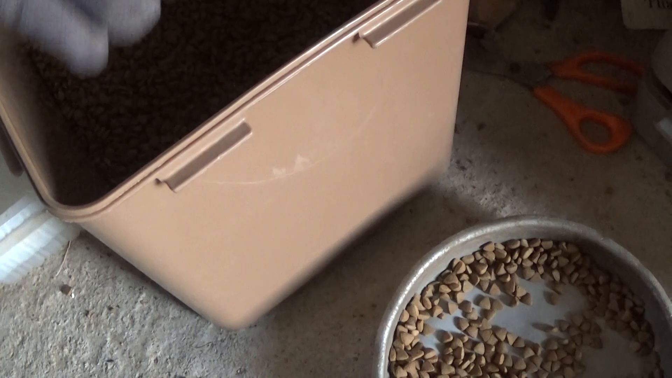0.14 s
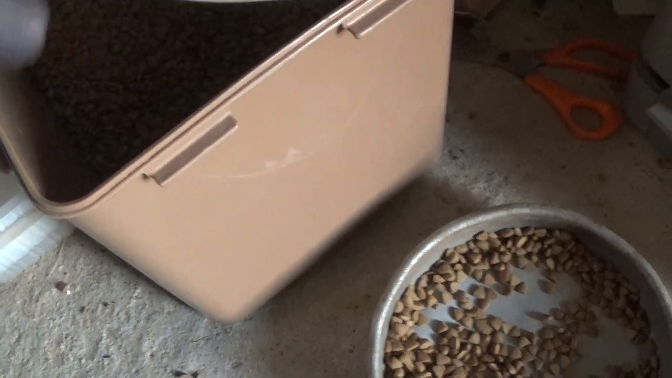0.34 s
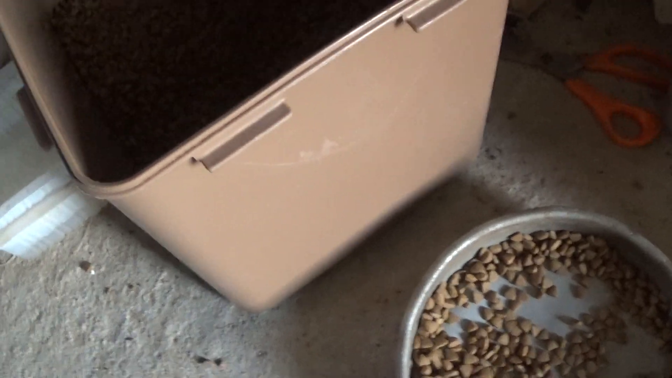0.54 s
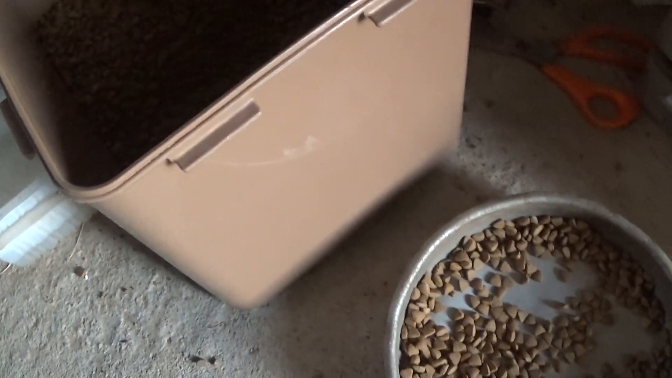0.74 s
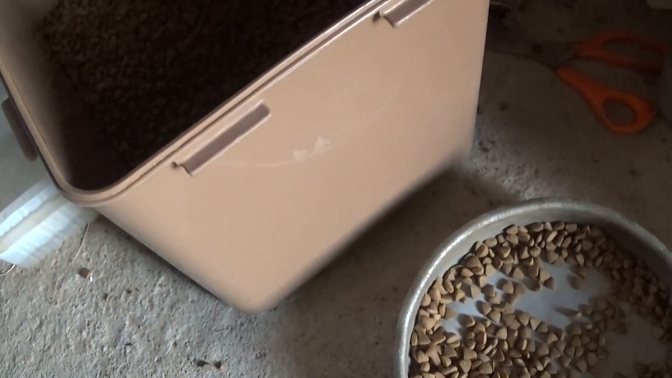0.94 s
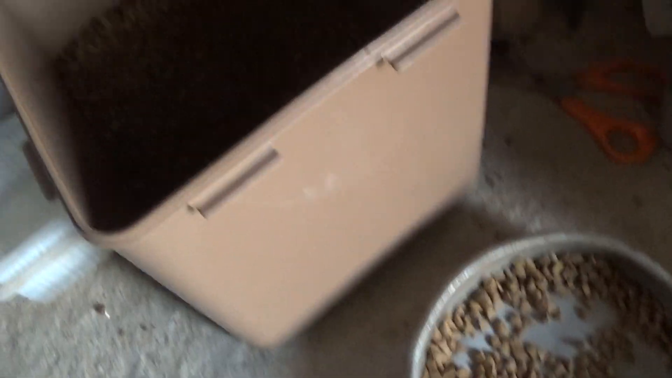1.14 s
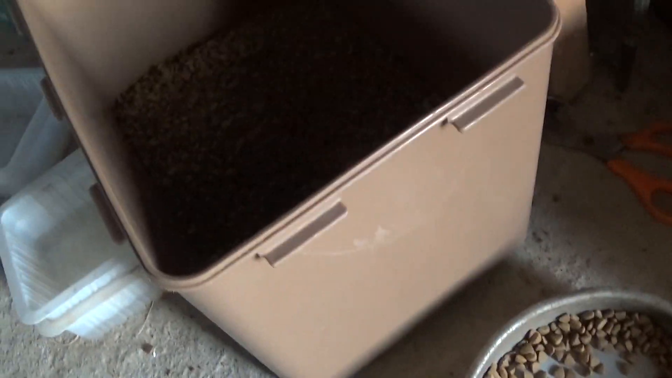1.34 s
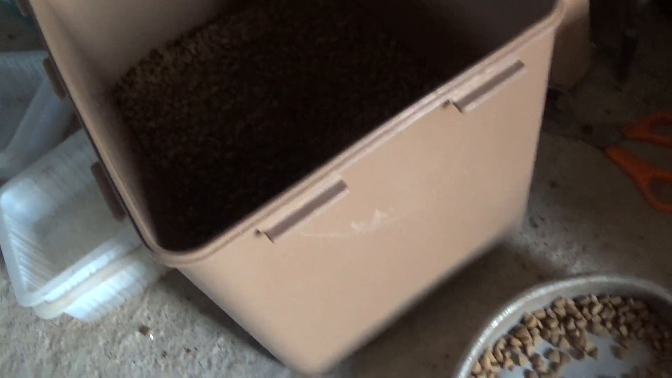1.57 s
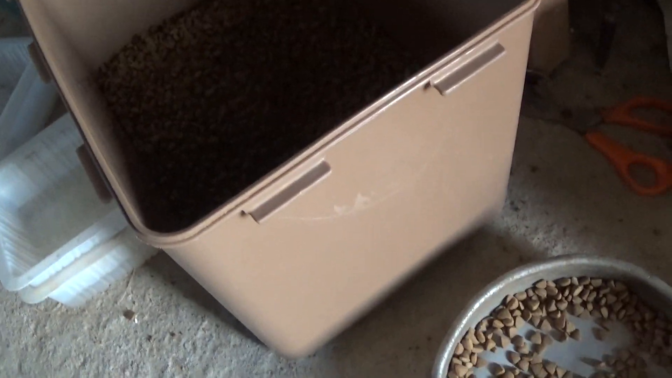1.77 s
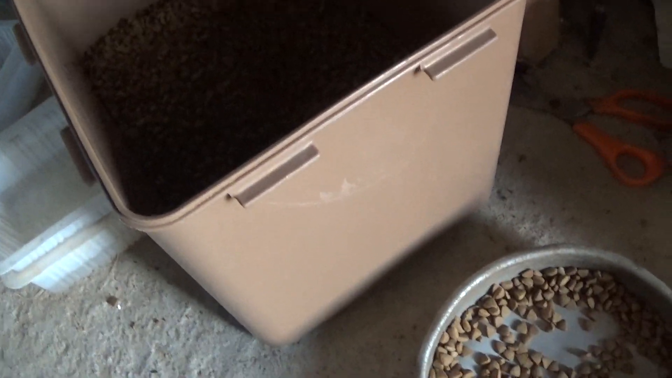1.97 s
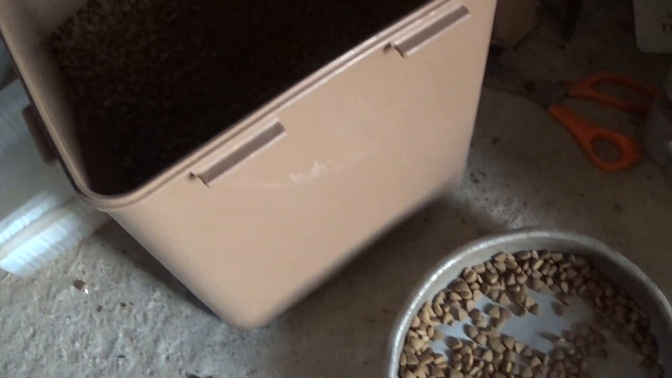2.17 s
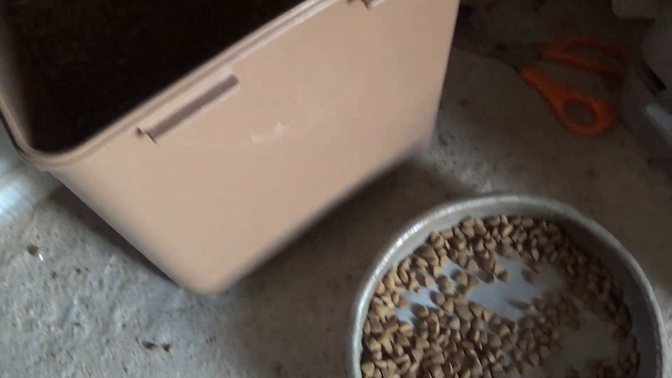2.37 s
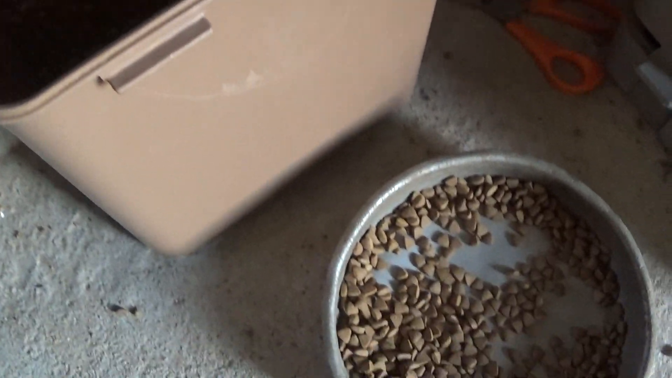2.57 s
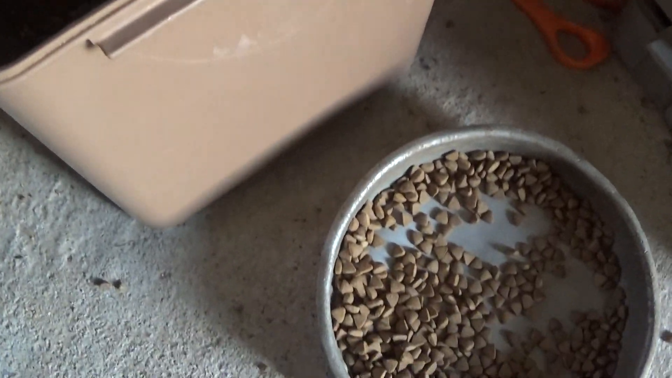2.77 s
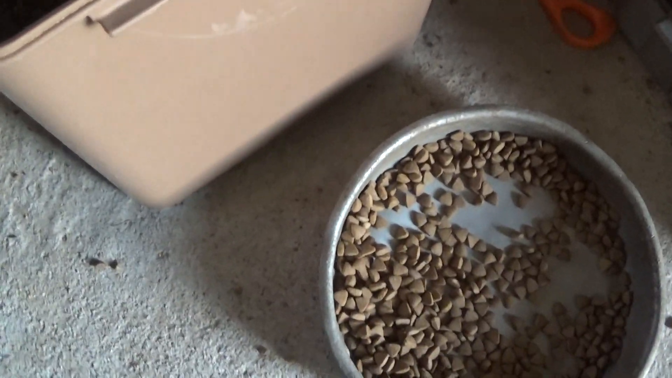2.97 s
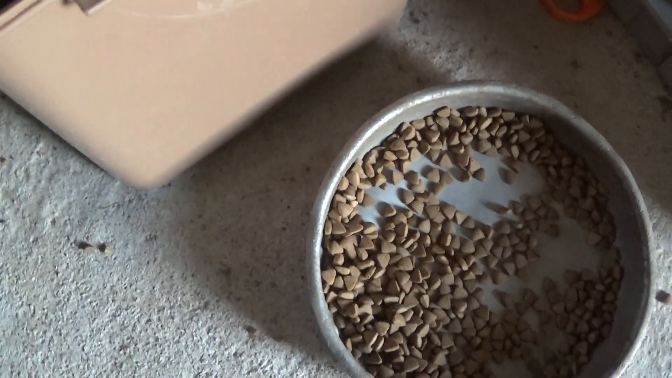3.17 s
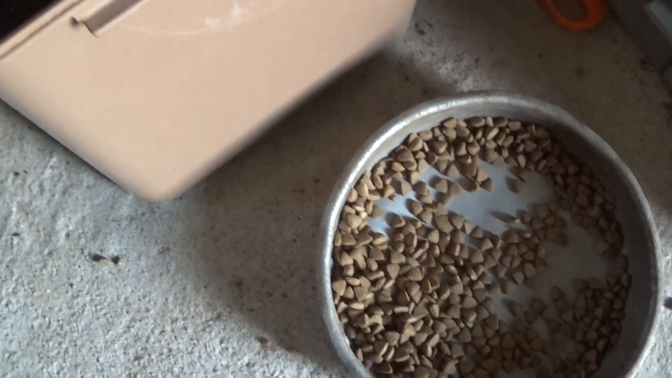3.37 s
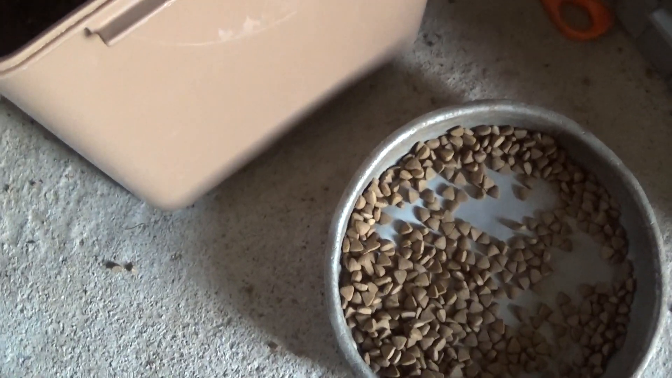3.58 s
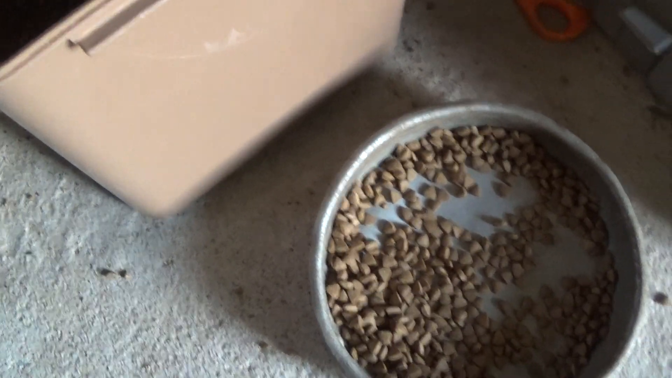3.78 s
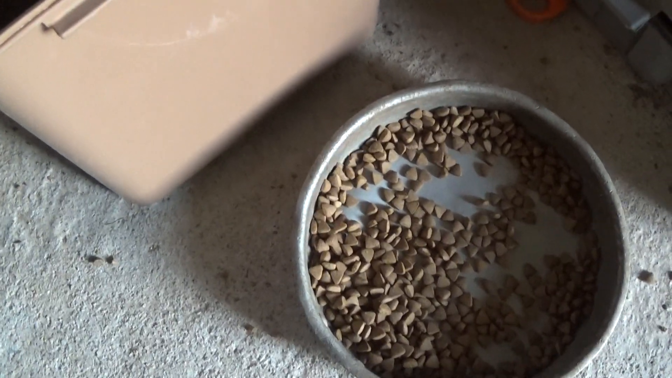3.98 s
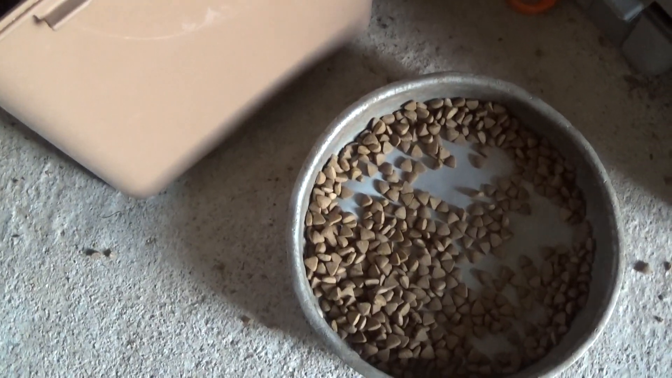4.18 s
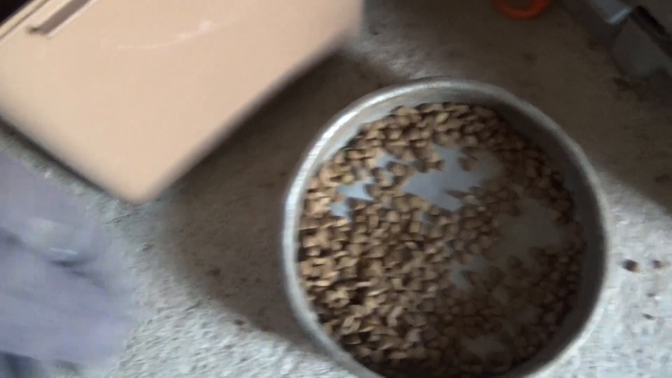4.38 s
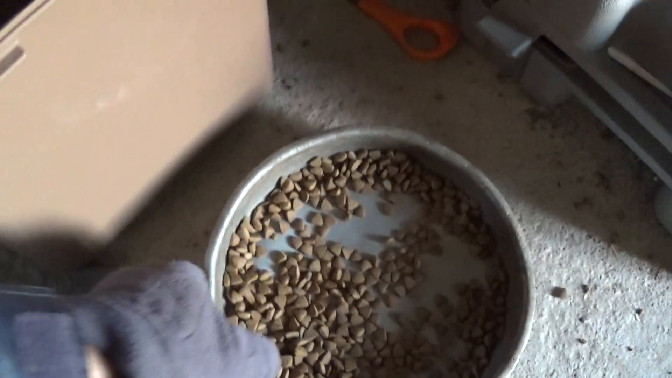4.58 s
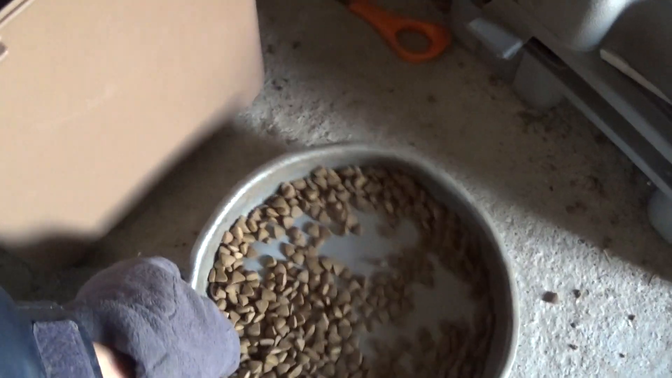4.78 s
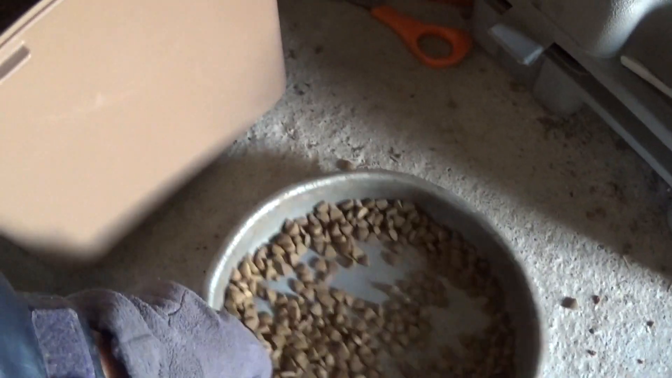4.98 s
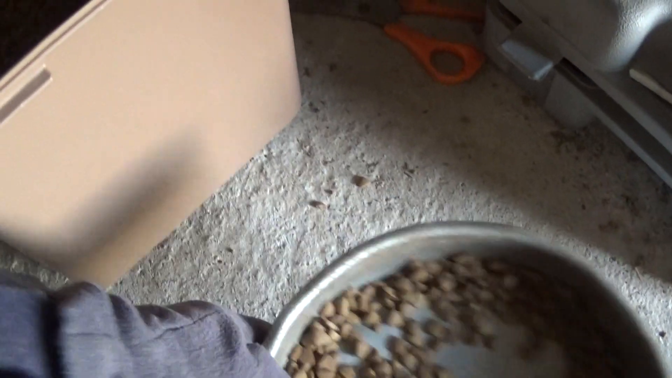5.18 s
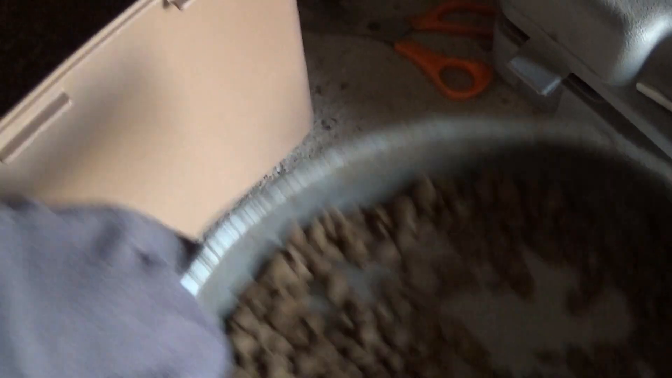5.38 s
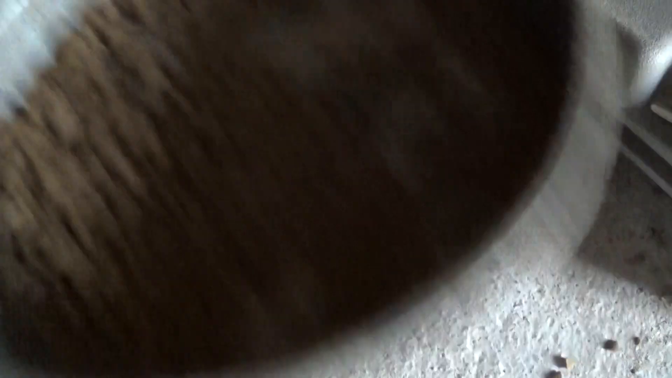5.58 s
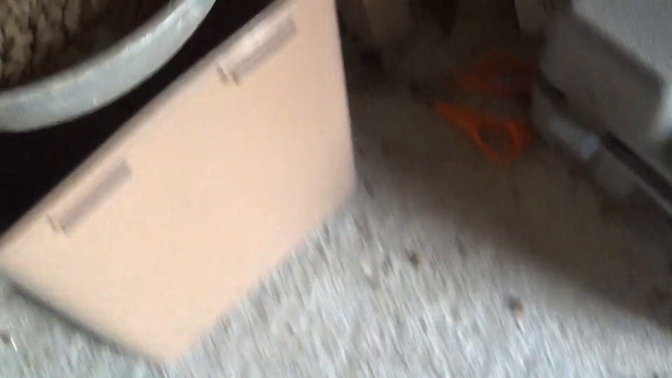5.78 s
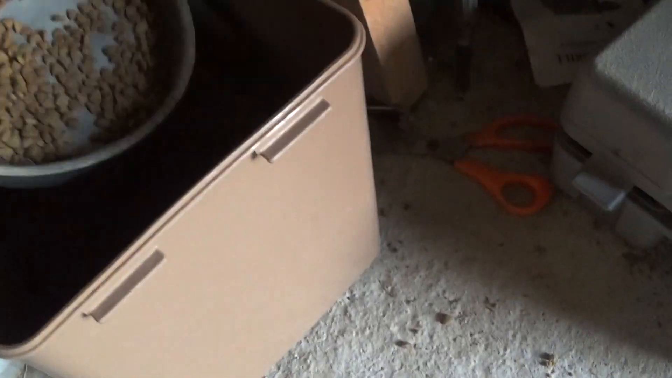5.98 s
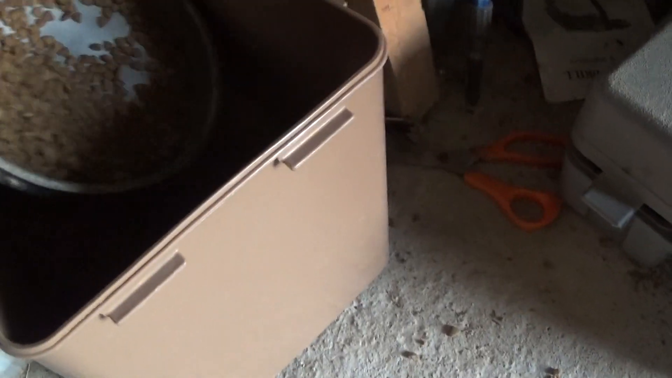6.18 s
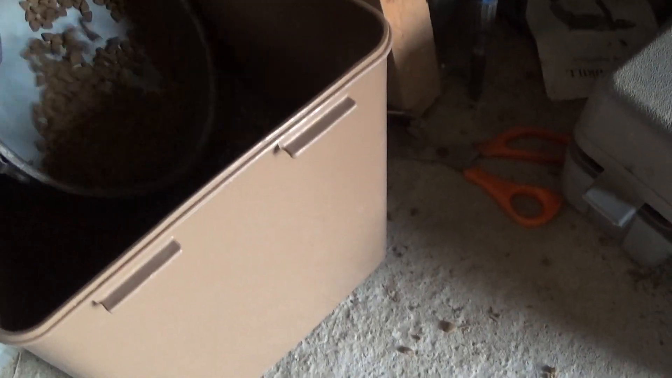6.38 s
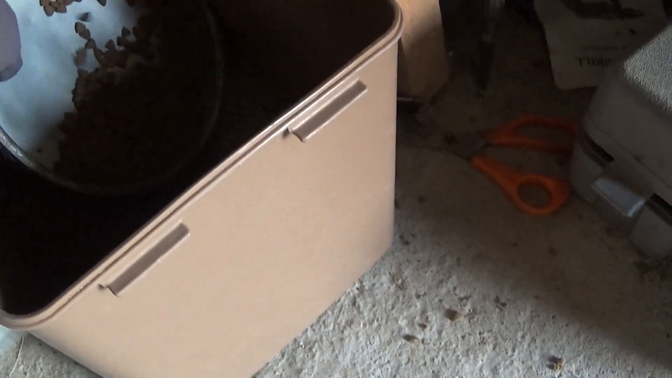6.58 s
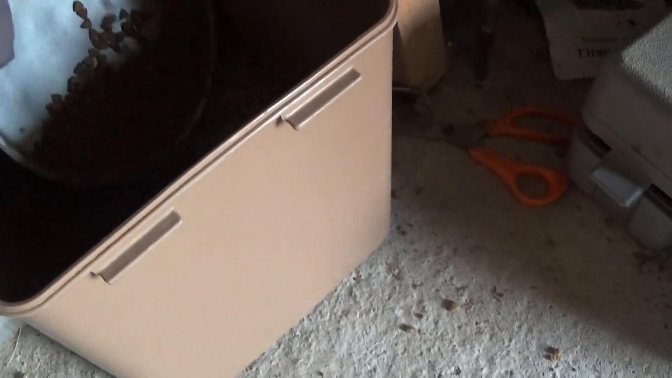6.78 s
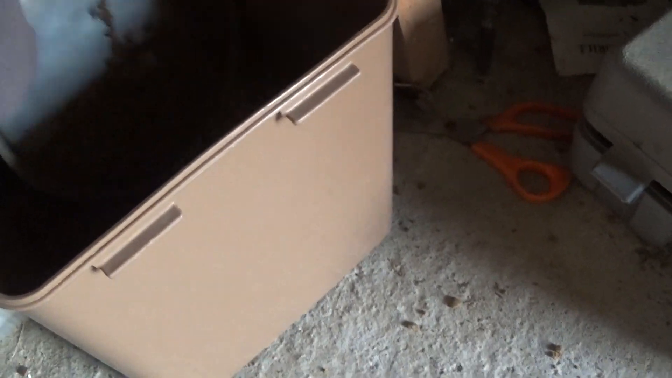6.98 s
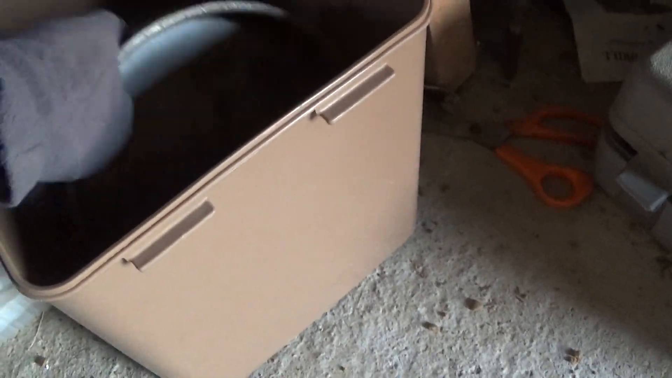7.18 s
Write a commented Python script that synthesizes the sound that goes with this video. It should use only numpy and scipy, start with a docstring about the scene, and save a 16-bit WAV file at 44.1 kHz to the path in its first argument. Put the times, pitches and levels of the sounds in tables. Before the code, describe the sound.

In a small shed, a hollow plastic bin bumps and scrapes across concrete in two short bouts, then takes several more knocks. Jacket fabric rustles throughout, close to the stereo microphone, over a faint low rumble from outside. A sleeve swishes, a metal bowl rasps and clicks as it is picked up, and finally dry kibble pours from it into the bin, ticking against the metal.

```python
"""A work jacket rustles close to a small stereo camera in a shed, over a faint outdoor rumble, and at once
a plastic feed bin is knocked and dragged in jerks over gritty concrete: impact and friction excite its
wall modes. A metal bowl of dry kibble is pulled off the floor in stick-slip snaps, carried to the bin and
tipped. The pieces slide, tick and finally rush out, and the bowl's modes rise as it sheds their mass."""
import sys
import numpy as np
from scipy import signal
from scipy.fft import rfft, irfft, next_fast_len
from scipy.io import wavfile
from scipy.ndimage import uniform_filter1d, minimum_filter1d

SR = 44100
rng = np.random.default_rng(int(sys.argv[2]) if len(sys.argv) > 2 else 0)


def dump(signal):
    """Clip the signal to [-1, 1] and save it as 16-bit WAV at the path in sys.argv[1]."""
    limited = np.clip(np.atleast_2d(signal).T, -1, 1)
    pcm = np.round(limited * 32767).astype(np.int16)
    wavfile.write(sys.argv[1], SR, pcm)


N = 318843
TIME = np.arange(N) / SR


def amp(db):
    """Amplitude ratio of a level in decibels."""
    return 10 ** (np.asarray(db) / 20)


def unit(x):
    """Normalisation to rms 1."""
    return x / np.sqrt(np.mean(x ** 2) + 1e-20)


def along(points, hz):
    """Interpolation of (frequency [Hz], value) points on a logarithmic frequency axis."""
    f, values = np.transpose(points)
    return np.interp(np.log(hz + 1), np.log(f + 1), values)


def curves(rows):
    """Linear envelopes, one for each column after time; the first is silent outside the table."""
    times, first, *others = np.transpose(rows)
    return [np.interp(TIME, times, first, -140, -140)] + [np.interp(TIME, times, c) for c in others]


def filtered(x, response):
    """Linear filtering: the spectrum is multiplied by a complex frequency response."""
    size = next_fast_len(N + SR // 8, True)
    return irfft(rfft(x, size) * response(np.fft.rfftfreq(size, 1 / SR)), size)[..., :N]


def highpass(corner_hz, order):
    """Response of cascaded first-order high-pass stages."""
    return lambda hz: (1j * hz / (1j * hz + corner_hz)) ** order


def colour(points):
    """Minimum-phase response through (frequency [Hz], gain [dB]) points, at unit power gain."""
    def response(hz):
        cepstrum = irfft(np.log(amp(along(points, hz)) + 1e-6))
        cepstrum[1:len(hz) - 1] *= 2
        cepstrum[len(hz):] = 0
        gain = np.exp(rfft(cepstrum))
        return gain / np.sqrt(np.mean(abs(gain) ** 2))
    return response


def modal(modes, widen):
    """Modal superposition at unit power gain; widen multiplies every bandwidth."""
    def response(f):
        gain = sum((-1) ** k * amp(db) * 1j * f * width * widen / (hz * hz - f * f + 1j * f * width * widen)
                   for k, (hz, width, db) in enumerate(modes))
        return gain / np.sqrt(np.mean(abs(gain) ** 2))
    return response


def resonance(x, hz, width_hz):
    """A single damped resonator that passes white noise at its own level."""
    return signal.lfilter(*signal.iirpeak(hz, hz / width_hz, SR), x) * np.sqrt(SR / np.pi / width_hz)


def grit(per_s, spread_db, t60, bed):
    """Shot noise: random contacts decay exponentially over a bed of steady friction."""
    hits = (rng.random(N) < per_s / SR) * amp(spread_db * rng.standard_normal(N))
    decay = amp(-60 * TIME[:SR // 20] / t60)
    envelope = unit(np.abs(signal.oaconvolve(hits, decay)[:N]))
    return unit((bed + envelope) * rng.standard_normal(N))


def bursts(times, db, t60, rise_s):
    """Impact transients: an exponentially decaying noise burst at each time."""
    t, hits = TIME[:SR // 10], np.zeros(N)
    hits[np.round(times * SR).astype(int)] = amp(db)
    shape = amp(-60 * t / t60) * (1 - np.exp(-t / rise_s))
    return signal.oaconvolve(hits, shape / shape.max())[:N] * rng.standard_normal(N)


def rings(times, db, pitch_hz, t60, wander):
    """Damped free vibrations whose phase takes a random walk as the contact shifts."""
    out, t = np.zeros(N), TIME[:SR // 20]
    for start, level_db, hz, life in zip(times, db, pitch_hz, np.broadcast_to(t60, len(times))):
        drift = np.cumsum(wander * rng.standard_normal(len(t)))
        envelope = amp(level_db - 60 * t / life) * np.minimum(1, t * hz)
        out[round(start * SR):][:len(t)] += envelope * np.sin(2 * np.pi * hz * t + drift)
    return out


def patchy(x, spread_db):
    """Random amplitude modulation in patches of time and frequency."""
    spectra = signal.stft(x, nperseg=256)[2]
    field = uniform_filter1d(rng.standard_normal(spectra.shape), size=4, axis=0)
    field = unit(uniform_filter1d(field, size=14, axis=1))
    return unit(signal.istft(spectra * amp(spread_db * field), nperseg=256)[1][:N])


# Cloth rubbing as the arm moves, and quick sleeve brushes: (time [s], hiss [dB], rustle [dB])
CLOTH_LEVELS = [(0, -51.5, -56.5), (0.08, -62, -50.5), (0.28, -38.5, -40), (0.72, -45, -41),
                (0.97, -36, -46.5), (1.03, -42, -44.5), (1.07, -54, -56), (1.24, -53, -51.5),
                (1.38, -65.5, -60.5), (1.5, -62, -54.5), (2.08, -46.5, -46), (2.58, -50.5, -46.5),
                (2.8, -58, -51), (3.16, -60, -56), (3.23, -42, -44.5), (3.45, -50.5, -48.5),
                (3.61, -61.5, -51), (3.8, -55, -47.5), (3.99, -53, -57), (4.1, -55, -42.5), (4.3, -34, -41),
                (4.5, -27.5, -32.5), (4.78, -48.5, -37.5), (5.23, -42.5, -41.5), (5.6, -38, -45.5),
                (5.67, -58.5, -60), (5.96, -53.5, -47.5), (6.08, -59.5, -55), (6.2, -39, -51)]
SLEEVE_BRUSHES = [(2.723, -48.5, -44.5), (2.946, -51, -45.5), (3.64, -47.5, -59), (3.71, -43, -57),
                  (3.857, -42, -47)]
# Bright and dull friction spectra: (frequency [Hz], relative level [dB])
HISS_SPECTRUM = [(1760, -12), (3000, 4), (8170, 3.5), (9460, 5.5), (11600, -2.5), (16000, -19.5)]
RUSTLE_SPECTRUM = [(60, -65), (227, -17), (360, -14), (654, -6), (857, -5.5), (1080, -4), (6000, -16),
                   (7800, -47)]


def jacket():
    """Friction noise: fibres catch by the thousand and merge into two almost smooth layers."""
    rise_db_per_s, fall_db_per_s = 476, 317
    gains = amp(curves(CLOTH_LEVELS)) * (TIME < CLOTH_LEVELS[-1][0])
    for start, *db in SLEEVE_BRUSHES:
        near = slice(round((start - .1) * SR), round((start + .2) * SR))
        t = TIME[near] - start
        gains[:, near] += amp(np.c_[db] + np.minimum(rise_db_per_s * t, -fall_db_per_s * t))
    hiss = filtered(patchy(rng.standard_normal(N), spread_db=1.3), colour(HISS_SPECTRUM))
    rustle = filtered(patchy(rng.standard_normal(N), spread_db=1.3), colour(RUSTLE_SPECTRUM))
    return gains[0] * hiss + gains[1] * rustle


# Far-off outdoor sound: (frequency [Hz], relative level [dB])
RUMBLE_SPECTRUM = [(25, -9.5), (250, 5.5), (500, 13), (1500, -99)]


def outdoor_rumble():
    """Ambient noise: distant sound forms a stationary low-frequency floor."""
    return amp(-62.5) * filtered(rng.standard_normal(N), colour(RUMBLE_SPECTRUM))


# Modes of the bin's walls: (frequency [Hz], nominal bandwidth [Hz], relative level [dB])
BIN_MODES = [(215, 45, -2.5), (265.5, 34, 4.5), (635, 39, 1), (1009, 115, 6.5), (1355, 340, 3),
             (1960, 700, 0), (4310, 1900, -2)]
# Spectra of the scraping bin and of small hard contacts: (frequency [Hz], relative level [dB])
SCRAPE_SPECTRUM = [(180, -82), (300, -20), (463, -9.5), (636, 1.5), (828, 0), (1300, -8), (1920, -0.5),
                   (7000, -13), (9100, -31), (12000, -76)]
TICK_SPECTRUM = [(2940, -48), (5000, 0.5), (7340, 3.5), (9690, 6), (13000, -7.5), (16000, -32)]
# Blows on bin and floor: (time [s], nominal level [dB], clack [Hz], relative boom [dB], relative crack [dB])
BIN_KNOCKS = [(0.081, -20, 850, -8, -36), (0.122, -9, 1190, -27, -15), (0.134, -12, 588, -30, -9),
              (0.147, -5, 552, -31, -36), (0.397, -4, 1570, -11.5, -21), (0.412, -7, 4730, -34, -37),
              (0.485, -7, 550, -35, -18), (0.565, -12.5, 704, -22, -3), (0.588, -4.5, 2880, -22, -19),
              (0.639, -13.5, 2370, -27, -22), (0.738, -14.5, 2436, -26, -31), (0.822, -20.5, 687, -21, -22),
              (1.235, -36, 3780, -37, 3), (1.271, -21, 1086, -47, -37), (1.304, -28.5, 945, -37, -40),
              (1.519, -3.5, 678, -24, -24), (1.752, -13.5, 1520, -10.5, -29), (1.807, -2, 1490, -43, -29),
              (1.986, -13.5, 2100, -46, -40), (2.379, -27, 1900, -43, -35), (2.427, -21.5, 1690, -43, -20),
              (2.816, -26, 2600, -34, -21), (2.9, -27.5, 3020, -38, -13), (2.918, -24.5, 1796, -23, -22),
              (2.923, -21, 4070, -31, -19.5), (3.076, -30.5, 674, -36, -21), (4.009, -2.5, 743, -11.5, -19),
              (4.029, -7.5, 1046, -25, -18), (4.11, -10, 620, -20, -19.5), (4.167, -11.5, 1225, -7, -10.5),
              (4.257, -14.5, 804, -14.5, -31), (4.326, -14.5, 740, -17, -33), (6.503, -21, 924, -49, 0),
              (6.505, -7.5, 232, -34, -30)]


def bin_knocks():
    """Impulse response: a blow excites the walls, the struck spot clacks and the lowest mode booms."""
    times, db, clack_hz, boom_db, crack_db = np.transpose(BIN_KNOCKS)
    walls = filtered(bursts(times, db - 17.5, t60=.05, rise_s=.00015), modal(BIN_MODES[2:], widen=.24))
    scuff = filtered(bursts(times, db - 13.5, t60=.053, rise_s=.001), colour(SCRAPE_SPECTRUM))
    clack_t60 = np.minimum(.05, 63 / clack_hz)  # high clacks die within 63 cycles
    clack = rings(times, db - 7, clack_hz, clack_t60, wander=.11)
    blows = np.bincount(np.round(times * SR).astype(int), amp(db + boom_db + 18), minlength=N)
    boom = filtered(blows, modal(BIN_MODES[:1], widen=.22))
    crack = filtered(bursts(times, db + crack_db - .5, t60=.033, rise_s=.000099), colour(TICK_SPECTRUM))
    return filtered(walls + scuff + clack + boom, highpass(150, order=4)) + crack


# Jerks over grit: (time [s], hold [s], level [dB], hollow resonance [Hz], relative fine grit [dB],
# relative boom [dB], flexing wall [Hz], relative wall ring [dB])
BIN_JERKS = [(0.127, 0.062, -21, 2250, -21, -13, 543, -11.5), (0.43, 0.11, -18, 2460, -16.5, -7, 578, -9),
             (0.585, 0.02, -19.5, 2580, -15, -4.5, 548, -7.5),
             (1.522, 0.11, -18.5, 1780, -19.5, -24, 644, -48), (1.691, 0.029, -36, 1450, -34, -7, 640, -17),
             (1.78, 0.02, -28, 1400, -27, -20, 646, -3), (1.808, 0.089, -16.5, 1470, -17.5, -59, 663, -11),
             (1.924, 0.0093, -23.5, 1800, -33, -50, 663, -16),
             (1.951, 0.05, -33.5, 1710, -41, -47, 666, -1.5)]
# Thin high modes of the bin's base: (frequency [Hz], relative level [dB])
RIB_MODES = [(4150, -18), (4950, 7), (6150, 8)]


def bin_drag():
    """Forced vibration: grit under the sliding base drives the bin's modes during each jerk."""
    rise_db_per_s, fall_db_per_s = 3500, 449
    rub = grit(per_s=800, spread_db=4.5, t60=.005, bed=.4)
    walls = filtered(rub, modal(BIN_MODES[2:], widen=.24))
    scrape = .71 * filtered(rub, colour(SCRAPE_SPECTRUM)) + .43 * walls
    boom = filtered(rub, modal(BIN_MODES[1:2], widen=2.2))
    fine = filtered(grit(per_s=450, spread_db=5.5, t60=.012, bed=.35), colour(TICK_SPECTRUM))
    ribs = amp(-16) * filtered(rub, modal([(hz, 82.5, db) for hz, db in RIB_MODES], widen=1))
    drag, t = np.zeros(N), TIME[:SR // 2] - .05
    for start, hold, db, hollow_hz, fine_db, boom_db, ring_hz, ring_db in BIN_JERKS:
        near = round((start + t[0]) * SR) + np.arange(len(t))
        gain = amp(db + np.minimum(0, np.minimum(rise_db_per_s * t, fall_db_per_s * (hold - t))))
        ring = amp(ring_db) * resonance(gain * rub[near], ring_hz, width_hz=32)
        hollow = amp(-8.5) * resonance(gain * rub[near], hollow_hz, width_hz=630)
        sliding = scrape[near] + amp(boom_db) * boom[near] + amp(fine_db) * fine[near] + ribs[near]
        drag[near] += gain * sliding + ring + hollow
    return drag


# One sweep of a sleeve: (time [s], level [dB], frequency [Hz])
SLEEVE_SWISH = [(4.38, -29.5, 1313), (4.53, -57, 1178), (4.66, -31, 564)]


def sleeve_swish():
    """Narrow-band noise: a falling tone with random amplitude modulation gives the sleeve's swish."""
    db, hz = curves(SLEEVE_SWISH)
    flutter = unit(uniform_filter1d(rng.standard_normal(N), size=500))
    return amp(db) * flutter * np.sin(2 * np.pi * np.cumsum(hz) / SR)


# Bowl rasping over the floor: (time [s], level [dB], relative fine grit [dB])
PULL_LEVELS = [(4.795, -45, 4), (4.812, -22, -8.5), (4.84, -21.5, -7), (4.875, -44, 2), (4.94, -34, -22),
               (4.965, -56, -2), (5.05, -41.5, 6.5), (5.12, -34, 2), (5.15, -40, 6.5), (5.212, -66, 29)]
# Modes of its bottom on stone: (frequency [Hz], nominal bandwidth [Hz], relative level [dB])
BOTTOM_MODES = [(1450, 91, 15.5), (2070, 850, 7.5), (5800, 680, 3)]
# Sudden slips: (time [s], ring level [dB], ring frequency [Hz], crack level [dB])
BOWL_SLIPS = [(4.809, -13.5, 1580, -33), (4.819, -9, 1880, -32), (4.827, -12, 1650, -27),
              (4.84, -11, 1630, -34), (4.868, -11.5, 2280, -32), (4.882, -14, 2110, -38),
              (4.892, -17, 2150, -28), (4.896, -7.5, 2080, -32), (4.906, -10.5, 1980, -16),
              (4.916, -15, 2200, -32), (4.923, -9.5, 2150, -43), (4.935, -14, 2310, -30),
              (4.949, -10.5, 2350, -26.5), (4.973, -10, 2300, -34), (4.983, -4, 1015, -24),
              (5.006, -7, 954, -27), (5.038, -13.5, 1370, -28), (5.117, -16.5, 1340, -17.5),
              (5.186, -42, 1400, -15.5), (5.191, -45, 930, -19), (5.199, -46, 920, -17),
              (5.321, -28, 1960, -28.5)]


def bowl_pull():
    """Stick-slip friction: the loaded bottom rasps on stone; each slip snaps and briefly rings it."""
    db, fine_db = curves(PULL_LEVELS)
    times, ring_db, hz, crack_db = np.transpose(BOWL_SLIPS)
    rub = grit(per_s=300, spread_db=4, t60=.012, bed=.5)
    fine = amp(fine_db) * filtered(rub, colour(HISS_SPECTRUM))
    rasp = amp(db) * (filtered(rub, modal(BOTTOM_MODES, widen=.88)) + fine)
    octave = rings(times, ring_db - 11, 2 * hz, t60=.016, wander=.07)
    ring = rings(times, ring_db, hz, t60=.016, wander=.12)
    crack = filtered(bursts(times, crack_db, t60=.013, rise_s=.00011), colour(TICK_SPECTRUM))
    return filtered(rasp + octave + ring, highpass(350, order=2)) + crack  # small contacts lack bass


# Kibble sliding out: (time [s], slide [dB], treble [dB], bin thud [dB])
POUR_LEVELS = [(6.1, -69, -73, -74), (6.13, -49, -63, -66), (6.25, -37.5, -35.5, -48),
               (6.35, -31.5, -28.5, -62), (6.5, -33, -24.5, -48), (6.575, -38, -33, -36),
               (6.625, -27, -21.5, -38.5), (6.64, -39.5, -37.5, -38), (6.8, -38, -33, -44),
               (6.9, -35.5, -27.5, -34), (7.05, -39.5, -29, -27.5), (7.11, -35.5, -21, -22),
               (7.23, -30, -19.5, -31.5)]
# Single pieces striking metal: (time [s], nominal level [dB])
PIECE_HITS = [(6.304, -7.5), (6.3613, -4.5), (6.388, -12), (6.4315, -3.5), (6.4622, -13), (6.487, -3),
              (6.5265, 0), (6.551, -4), (6.5944, -5), (6.6978, -12), (6.7445, -11), (6.7664, -10),
              (6.7852, -6.5), (6.8161, -4.5), (6.8513, -8.5), (6.8641, -7.5), (6.8788, -1), (6.9023, -11),
              (6.9255, -19), (6.9474, -8.5), (6.9729, -6.5)]
# Tipped bowl's modes: (loaded [Hz], loaded level [dB], bare [Hz], bare level [dB], nominal bandwidth [Hz])
BOWL_MODES = [(1560, 7, 1590, 9, 96), (1945, 6.5, 2070, 7.5, 196), (2260, 9, 3160, 8.5, 450),
              (3234, 14, 4270, 13.5, 160), (4150, 10.5, 4610, 10, 210), (5630, 2.5, 5700, 7, 290)]


def kibble_pour():
    """Mass loading: rolling pieces excite the bowl, whose modes rise as they leave and thud into the bin."""
    slide_db, treble_db, thud_db = curves(POUR_LEVELS)
    times, hit_db = np.transpose(PIECE_HITS)
    pouring = TIME > POUR_LEVELS[0][0]
    fine = grit(per_s=600, spread_db=1.3, t60=.013, bed=5.9)
    clusters = grit(per_s=600, spread_db=4, t60=.005, bed=0)
    roll = pouring * unit(fine + .85 * clusters)
    drive = amp(slide_db) * pouring * patchy(roll, spread_db=1.7)
    drive += bursts(times, hit_db - 8.5, t60=.009, rise_s=.0002)
    loaded = filtered(drive, modal([(hz, width, db) for hz, db, _, _, width in BOWL_MODES], widen=1.1))
    bare = filtered(drive, modal([(hz, width, db) for _, _, hz, db, width in BOWL_MODES], widen=1))
    bare_share = np.interp(TIME, [6.45, 6.65], [.05, .95])
    landings = grit(per_s=142, spread_db=2.1, t60=.063, bed=.91)
    thud = pouring * amp(thud_db) * filtered(landings, modal(BIN_MODES[:5], widen=5.4))
    thud = filtered(thud, highpass(140, order=2))  # light pieces cannot move the walls slowly
    clatter = amp(treble_db) * roll * rng.choice([-1, 1], N)  # the rolling contacts, heard directly
    ticks = bursts(times, hit_db - 9, t60=.008, rise_s=.0002)
    treble = filtered(clatter + ticks, colour(TICK_SPECTRUM))
    return (1 - bare_share) * loaded + bare_share * bare + treble + thud


# Decay in the shed: (frequency [Hz], reverberation time [s])
SHED_T60 = [(200, 0.24), (2000, 0.31), (12000, 0.043)]


def shed(x):
    """Diffuse reverberation: each frequency decays at its own rate, in a separate tail for each side."""
    hz, t, spectra = signal.stft(rng.standard_normal((2, SR // 3)), SR, nperseg=128)
    tail = signal.istft(spectra * amp(-60 * t / along(SHED_T60, hz)[:, None]), SR, nperseg=128)[1]
    delayed = np.pad(x, (90, 0))  # 2 ms
    return signal.fftconvolve(delayed[None], tail / np.linalg.norm(tail[0]), axes=1)[:, :N]


def pan(x, left_over_right_db):
    """Intensity stereo: a level difference between the channels sets the direction."""
    return x * amp(np.outer([.5, -.5], left_over_right_db))


def scene():
    """Superposition of direct sound, outdoor rumble and reverberation, fed most by the bin's treble."""
    cloth = jacket() + sleeve_swish()
    feed_bin = bin_drag() + bin_knocks()
    bowl = bowl_pull() + kibble_pour()
    bin_side_db = np.interp(TIME, [.7, 1.5], [-2.5, 1.5])  # the camera turns away from the bin
    direct = pan(cloth, .2) + pan(feed_bin, bin_side_db) + pan(bowl, -1.2)
    bin_treble = .61 * np.diff(feed_bin, prepend=0)
    return direct + outdoor_rumble() + amp(-12) * shed(direct.mean(axis=0) + bin_treble)


# Imbalance of the microphone pair: (frequency [Hz], left over right [dB])
MIC_BALANCE = [(100, 1), (400, -1), (1500, 4.5), (12000, 1.4)]


def record(dry):
    """Transduction: the microphones lose deep bass and lean with pitch; peak and band limiting follow."""
    def microphones(hz):
        left_lag_rad = .19 * np.exp(-hz / 12600)
        phase = np.exp(1j * np.outer([-.5, .5], left_lag_rad))
        return pan(highpass(60, order=2)(hz), along(MIC_BALANCE, hz)) * phase
    x = filtered(dry, microphones)
    ceiling, top_hz = .6, 16000
    needed_gain = np.minimum(1, ceiling / (np.abs(x).max(axis=0) + 1e-9))
    held_gain = minimum_filter1d(needed_gain, size=301, origin=100)
    limited = x * uniform_filter1d(held_gain, size=101)
    return filtered(limited, lambda hz: hz < top_hz)


dry = scene()
out = record(dry)
dump(out)
```